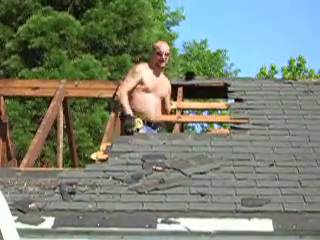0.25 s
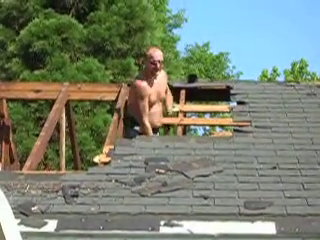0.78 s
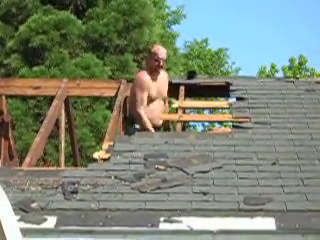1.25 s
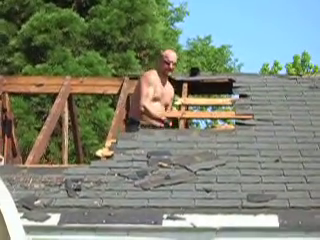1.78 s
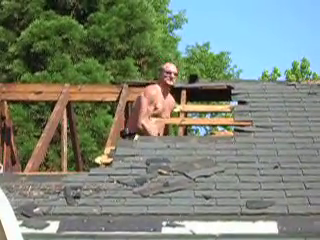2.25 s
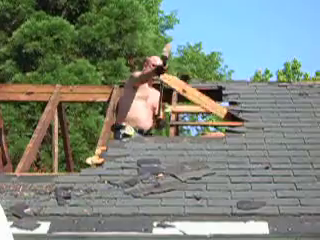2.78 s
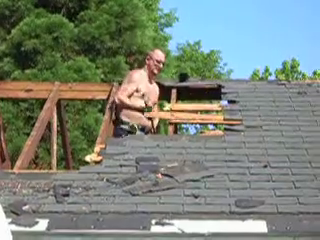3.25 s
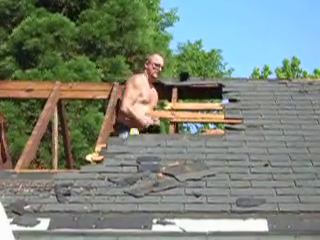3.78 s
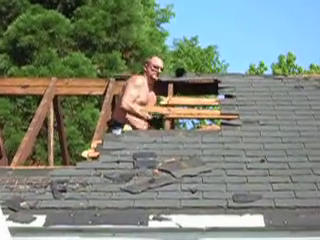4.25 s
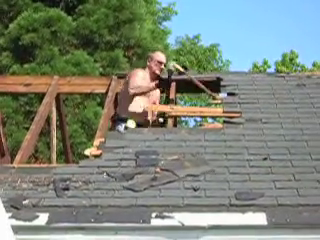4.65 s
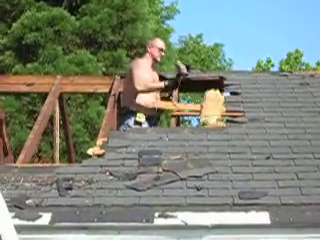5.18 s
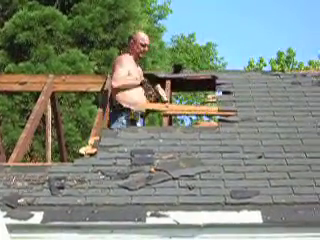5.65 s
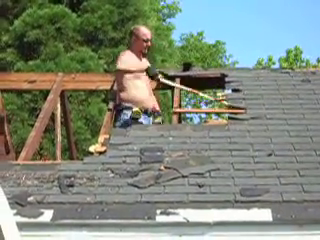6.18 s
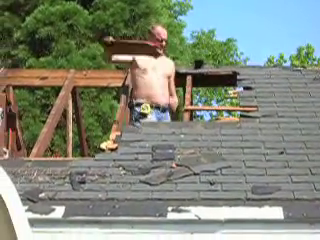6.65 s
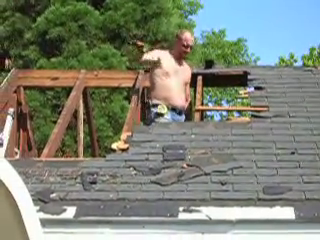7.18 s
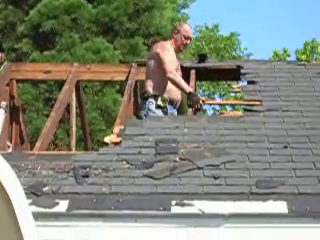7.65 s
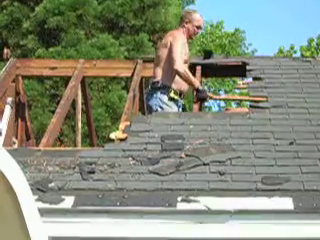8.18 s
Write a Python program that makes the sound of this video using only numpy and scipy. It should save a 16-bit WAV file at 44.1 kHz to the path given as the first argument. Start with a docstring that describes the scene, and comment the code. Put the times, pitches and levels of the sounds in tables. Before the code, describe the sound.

Outdoors, steady distant traffic rush and soft leaf hiss run throughout, with a faint low engine hum. Thin peeps come at 0.4-0.8 s, small chirps at 0.8 and 1.7, low hollow swells and a light shingle rustle, then a soft knock at 1.9. At 2.6 a board snaps off its nails with a hard woody crack; a hoarse, falling hawk scream follows at 2.9-3.3. A dull thud lands at 3.25. Sharp prying cracks with splintering and ringing bar chatter come at 4.3, 4.75 and 5.4, a chirp at 5.0. From 5.4 to 6.7 planks knock and tumble, boards scraping over grit, with another chirp at 6.2. Faint tyre whine passes near 7; a weaker scream falls at 7.4-7.9. Thuds at 7.8, a clear chirp at 7.9, then the loudest rapid clatter and scrape at 8.2. Narrow microphone, clipped peaks, light tree echo.

```python
"""First you hear the rush of distant traffic and hissing leaves, with a low hollow swell and a bird's peeps.
Then old boards are pried off a roof: nails crack loose, planks knock and drop, and boards slide over grit.
Blows are short bursts of ringing wood; traffic, leaves and scraping are shaped noise; bird calls are gliding
tones, with a hawk's falling screams among them. Trees echo the work and the birds.
A narrow-band microphone path lets a little folded-back treble through and clips the hardest cracks."""
import sys
import numpy as np
from scipy import signal
from scipy.fft import rfft, irfft, next_fast_len
from scipy.io import wavfile
from scipy.ndimage import uniform_filter1d, map_coordinates

SR = 44100
rng = np.random.default_rng(int(sys.argv[2]) if len(sys.argv) > 2 else 0)


def generate_wav(sig):
    """Save sig (samples, or channels by samples) to the path in sys.argv[1] as 16-bit PCM at SR."""
    pcm = np.round(np.clip(np.atleast_2d(sig).T, -1, 1) * 32767).astype(np.int16)
    wavfile.write(sys.argv[1], SR, pcm)


N = 371322
TIME = np.arange(N) / SR  # seconds

# Level of the road rush, before ROAD_DB: t/s, level/dB
ROAD_LEVEL = [(0.0, -32), (0.35, -32.5), (1.33, -32.5), (1.76, -29.5), (2.6, -30.5), (2.72, -36),
              (2.95, -32.5), (3.33, -27.5), (4.01, -33.5), (5.3, -30.5), (5.82, -24), (6.14, -28),
              (6.49, -27), (6.71, -31), (7.83, -30), (7.95, -26.5), (8.42, -34.5)]
# Colour of the road rush: f/Hz, relative level per Hz/dB
ROAD_COLOUR = [(18, -49), (30, -13), (32, -35.5), (54, -29), (74, -17.5), (118, -12.5), (147, -7),
               (206, -9), (298, 0), (365, -4), (491, -3), (590, -5), (794, -4), (1090, -12), (2500, -28),
               (3250, -45.5), (5500, -120)]
# Level of the leaf hiss, before LEAVES_DB: t/s, level/dB
LEAF_LEVEL = [(0.0, -43.5), (2.62, -44.5), (2.84, -36), (3.98, -46.5), (4.55, -39), (6.36, -43),
              (6.47, -36), (6.82, -46.5), (7.34, -47), (7.69, -46.5), (8.18, -42.5), (8.42, -37)]
# Colour of the leaf hiss: f/Hz, relative level per Hz/dB
LEAF_COLOUR = [(500, -22.5), (1200, 8.5), (2000, -1), (3000, 0.5), (3600, -3.5), (4000, -12), (4400, -16.5)]
ROAD_DB, LEAVES_DB = -0.06, 1
# A far engine, slowly receding
HUM_HZ, HUM_SAG_HZ_PER_S, HUM_DB, HUM_FADE_DB_PER_S = 153.4, 0.9, -43, 1.0
# Tyres of passing trucks: t/s, length/s, f/Hz, level/dB
TYRE_WHINES = [(6.88, 0.51, 411.6, -34), (7.93, 0.54, 378.5, -26)]
WHINE_SAG_HZ_PER_S = 9.5

# How long the tree echo rings at each frequency: f/Hz, time to fade by 60 dB/s
TREE_FADE = [(150, 0.24), (600, 0.12), (2000, 0.67), (4000, 0.55)]

# Start of each small bird chirp: t/s, level/dB
CHIRP_TIMES = [(0.819, -31.5), (1.659, -28.5), (1.94, -46), (2.0, -49), (5.032, -31), (6.223, -32),
               (7.894, -26.5)]
# Shape of one chirp: t from its start/s, f/Hz, level against the chirp's own/dB
CHIRP_SHAPE = [(0, 3406, -10.5), (.015, 3800, -9), (.03, 3547, -7.5), (.042, 2760, -16), (.055, 3190, 2),
               (.064, 3580, -7.5), (.075, 3060, -0.5), (.095, 2854, -10.5)]
# Single thin bird notes: t/s, f/Hz, level/dB
PEEP_NOTES = [(.395, 3300, -44.5), (0.689, 3970, -48.5), (0.72, 3950, -50), (0.785, 3980, -43.5),
              (1.985, 3300, -40), (2.035, 3140, -38)]

# A hawk's screams: t/s, length/s, rise/s, top f/Hz, end f/Hz, whistle level/dB,
# share of the call where the whistle peaks, harshness level/dB, fading of the harshness over the call/dB
HAWK_SCREAMS = [(2.91, .42, 0.0359, 931, 764.6, -31, 0.48, -31, 26.5),
                (7.424, .48, .064, 928, 793, -33.5, .15, -38, 7)]
SCOOP, SAG_SHAPE = 0.18, 0.68  # starts this share below the top; the fall is quick at first, then slower
WHISTLE_EDGE_DB = 11.5  # fading per call length on either side of the whistle's peak
WAVER_DB = 2

# Colour of grit under sliding boards and shingles: f/Hz, relative level per Hz/dB
GRIT_COLOUR = [(150, -29), (300, -13), (500, -6), (780, -0.5), (1050, -4), (1500, -8), (2100, -11.5),
               (3000, -13), (3700, -23), (4300, -36)]
# Boards dragged over grit: t/s, length/s, level the fading starts from/dB
BOARD_SLIDES = [(5.368, .25, -28), (5.658, 0.21, -33), (5.869, 0.29, -24.5), (6.338, 0.47, -28),
                (7.757, 0.23, -29.5), (8.184, 0.24, -20.5)]
SLIDE_ATTACK_S, SLIDE_LOSS_DB = 0.012, 18.5  # a quick start, then this loss over the slide's length
# Shingles shift: t/s, length/s, level the fading starts from/dB
SHINGLE_RUSTLES = [(1.247, 0.15, -41.5), (1.9, 0.19, -42.5), (2.672, .2, -38.5), (3.224, 0.079, -33.5)]
# Low hollow swells, from planks rubbing or from far traffic: t/s, length/s, level at the middle/dB
HOLLOW_SWELLS = [(0.29, 0.41, -34), (1.037, 0.1, -31), (1.53, 0.29, -30), (3.29, 0.33, -38),
                 (4.499, 0.21, -26.5), (7.25, .4, -36.5)]

# The steel pry bar springs free and chatters: t/s, level/dB
BAR_CHATTERS = [(4.315, -29), (4.779, -31), (5.38, -36)]
# Resonances of the bar chatter: f/Hz, width/Hz, relative level/dB
BAR_MODES = [(1544, 84, 7.5), (1686, 50, 7), (1640, 22, 4), (2070, 350, 4.5), (2410, 200, -2)]

# Resonances of the planks: f/Hz, width/Hz, relative level/dB
PLANK_MODES = [(274, 50, -4.5), (366, 140, -4), (500, 90, -1), (729, 160, -4.5), (1020, 380, -8),
               (1335, 140, -4.5), (1917, 130, -3.5), (1948, 65, -0.5), (2360, 180, -9), (2848, 100, -1.5),
               (3139, 74, -1), (3644, 220, -9)]
# Loose planks strike the roof, and hard cracks follow two of the nail snaps: t/s, knock level/dB, knock f/Hz,
# hardness 0-1, time to fade by 60 dB/s
PLANK_KNOCKS = [(1.907, -23, 690, 0.15, 0.045), (2.636, -18, 810, 0.84, 0.011),
                (4.765, -19.5, 1190, 1, .012), (5.640, -16.5, 530, 0.74, 0.087),
                (5.684, -25.5, 1226, 1, .08), (5.861, -19, 472, 1, 0.1), (5.897, -17, 738, 0.1, 0.13),
                (5.912, -16.5, 836, 0.13, 0.12), (5.932, -18.5, 831, 0, 0.17),
                (6.297, -16.5, 587, 0.45, 0.2), (6.381, -15.5, 1118, 1, 0.11), (6.393, -21, 737, 1, 0.052),
                (6.475, -31, 707, 0.65, .13), (6.546, -23, 605, 0.4, 0.25), (6.671, -25.5, 765, 0.35, 0.16),
                (8.175, -11.5, 770, 0.4, 0.042), (8.181, -13, 1510, .35, 0.051),
                (8.1992, -15.5, 1457, 0.7, 0.02), (8.211, -19, 1920, 0.6, 0.026),
                (8.2404, -15.5, 1320, 0.5, 0.012), (8.2655, -16.5, 830, 0.8, 0.021),
                (8.276, -22, 935, .95, 0.034)]
# Against the knock: a flat landing moves the deck, an edge does not
SOFT_THUD_DB, HARD_THUD_DB = -1.5, -27
SOFT_CRACK_DB, HARD_CRACK_DB = -18.5, -7
DECK_HZ = 291.6
# Weight lands on the deck, and at 4.286 s a board first gives before its nail snaps: t/s, thud level/dB, thud
# f/Hz
DECK_THUDS = [(3.249, -19.5, 296), (4.286, -22.5, 364), (4.609, -36, 331), (5.724, -16.5, 248),
              (7.763, -21, 248), (7.777, -20, 351), (7.821, -21, 292), (8.058, -35, 383)]
THUD_KNOCK_DB, THUD_CRACK_DB, THUD_KNOCK_HZ, THUD_T60 = -10.5, -20.5, 466, 0.13  # levels against the thud

# A board is levered off its nails: t/s, thud level/dB, knock level/dB, crack level/dB, thud f/Hz, knock f/Hz,
# time to fade by 60 dB/s, time the board gives before the snap/s, give level/dB, first splinter's level/dB
NAIL_PRIES = [(2.6058, -13, -13.5, -15, 262, 798, 0.056, 0.0019, -21, -19),
              (4.3048, -30, -19.5, -11.5, 340, 1304, 0.061, .010, -18, -30),
              (4.7465, -26, -16.5, -16, 360, 792, 0.058, 0.0077, -18.5, -34),
              (5.368, -25.5, -12.5, -20, 307, 1020, 0.015, .017, -22, -32.5)]
DECK_LAG_S, DECK_T60 = 0.003, 0.055  # the deck swings back just after the snap
# The board yielding: (thud, knock, crack) against the give level in dB, knock pitch, 60 dB fade time in s
GIVE_BALANCE_DB, GIVE_HZ, GIVE_T60 = (-2, -2.5, -8), 605, 0.09
# Fibres tear one after another
SPLINTER_DELAY_S, SPLINTER_GAP_S, SPLINTER_LOSS_DB, SPLINTER_T60 = 0.016, 0.015, 4, 0.055
SPLINTER_THUD_DB, SPLINTER_KNOCK_DB = -3.5, -2.5  # against their crack

MIC_HZ, TOP_HZ = 4100, 15800  # upper limits of the microphone path and of the clipped sound


def amp(db):
    """Turn decibels into gain."""
    return 10 ** (np.asarray(db) / 20)


def unit(x):
    """Scale to an average strength (rms) of 1."""
    return x / np.sqrt(np.mean(x ** 2) + 1e-20)


def along(points, hz):
    """Read a curve of (Hz, value) points on a log frequency axis."""
    f, v = np.transpose(points)
    return np.interp(np.log(hz + 1), np.log(f + 1), v)


def curves(rows, t=TIME):
    """Give one value per sample for each column after the time."""
    s, *columns = np.transpose(rows)
    return [np.interp(t, s, column) for column in columns]


def during(rows, t=TIME):
    """A gate that is 1 from the first row's time to the last, with 13 ms ramps inside both ends."""
    return np.clip(np.minimum(t - rows[0][0], rows[-1][0] - t) / 0.013, 0, 1)


def arch(s, length):
    """A half-sine swell that starts at time s."""
    return np.sin(np.pi * np.clip((TIME - s) / length, 0, 1))


def wobble(rate):
    """A smooth random curve through this many random points a second."""
    return map_coordinates(rng.standard_normal(int(N * rate / SR) + 4), [TIME * rate])


def cycles(hz):
    """Add up a moving frequency into a phase."""
    return 2 * np.pi * np.cumsum(hz) / SR


def filtered(x, response):
    """Shape a sound with a response that depends on frequency."""
    m = next_fast_len(len(x) + SR // 4)
    return irfft(rfft(x, m) * response(np.fft.rfftfreq(m, 1 / SR)), m)[:len(x)]


def band(x, lo_hz, hi_hz):
    """Keep the frequencies between two limits."""
    return signal.sosfilt(signal.butter(3, [lo_hz, hi_hz], "band", fs=SR, output="sos"), x)


def body(modes, f):
    """Response of an object that rings at several (Hz, width, dB) resonances."""
    total = 0
    for k, (center, width, db) in enumerate(modes):
        ring = 1j * f * width / (center * center - f * f + 1j * f * width)
        total = total + (-1) ** k * amp(db) * ring
    return total


def add(track, s, sound):
    """Mix a sound into the track at time s."""
    part = track[max(round(s * SR), 0):][:len(sound)]
    part += sound[:len(part)]


def rush(spectrum, patchy_db):
    """Coloured noise of rms 1 whose gain varies in random patches of time and frequency."""
    z = signal.stft(rng.standard_normal(N), nperseg=1024)[2]
    field = uniform_filter1d(rng.standard_normal(z.shape), size=6, axis=0)
    field = uniform_filter1d(field, size=9, axis=1)
    noise = signal.istft(z * amp(patchy_db * unit(field)), nperseg=1024)[1][:N]
    return unit(filtered(noise, lambda hz: amp(along(spectrum, hz))))


def background():
    """Shaped noise makes road rush and leaf hiss; wavering tones make an engine hum and tyre whines."""
    road = amp(curves(ROAD_LEVEL)[0] + ROAD_DB + 0.13 * wobble(4.1)) * rush(ROAD_COLOUR, patchy_db=2.0)
    leaves = amp(curves(LEAF_LEVEL)[0] + LEAVES_DB) * rush(LEAF_COLOUR, patchy_db=2.5)
    hum_hz = HUM_HZ - HUM_SAG_HZ_PER_S * TIME + 3 * wobble(15)
    hum_db = HUM_DB - HUM_FADE_DB_PER_S * TIME + 3 * wobble(8)
    out = road + leaves + amp(hum_db) * np.sin(cycles(hum_hz))
    for s, length, whine_hz, db in TYRE_WHINES:
        phase = cycles(whine_hz - WHINE_SAG_HZ_PER_S * (TIME - s) + 5 * wobble(30))
        tread = np.sin(phase) + amp(-9 + 3 * wobble(20)) * np.sin(1.65 * phase)
        out += amp(db + 2.5 * wobble(12)) * arch(s, length) * tread
    return out


def trees(x, build_s):
    """The tree line scatters sound back; the echo builds up, then fades at a speed set by frequency."""
    hz, t, z = signal.stft(rng.standard_normal(SR), SR, nperseg=256)
    fade = amp(-60 * t / along(TREE_FADE, hz)[:, None])
    build = 1 - np.exp(-t / build_s)
    tail = signal.istft(z * fade * build, SR, nperseg=256)[1]
    return signal.fftconvolve(x, tail / np.linalg.norm(tail))[:N]


def small_bird():
    """Thin peeps, and chirps: a faint lead-in note, then a quick, slightly hoarse rise and fall."""
    out, t = np.zeros(N), np.arange(SR // 8) / SR
    hz, shape_db = curves(CHIRP_SHAPE, t)
    for s, db in CHIRP_TIMES:
        pitch = hz * (1 + 0.05 * wobble(700)[:len(t)])  # fast random pitch changes sound hoarse
        add(out, s, amp(db + shape_db) * during(CHIRP_SHAPE, t) * np.sin(cycles(pitch)))
    swell = np.hanning(SR // 30)
    for s, peep_hz, db in PEEP_NOTES:
        pitch = peep_hz * (1 + 0.014 * wobble(360)[:len(swell)])
        add(out, s, amp(db) * swell * np.sin(cycles(pitch)))
    return out


def hawk():
    """A scream scoops up and sags: fading harsh harmonics join a whistle on the fourth harmonic."""
    out = np.zeros(N)
    for s, length, rise_s, top_hz, end_hz, whistle_db, peak, harsh_db, fading_db in HAWK_SCREAMS:
        age = np.clip(TIME - s, 0, length)
        rising = np.clip(1 - age / rise_s, 0, 1)  # 1 down to 0
        falling = np.clip((age - rise_s) / (length - rise_s), 0, 1)  # 0 up to 1
        hz = top_hz * (1 - SCOOP * rising ** 2) + (end_hz - top_hz) * falling ** SAG_SHAPE
        phase = cycles(hz * (1 + 0.008 * wobble(250) + 0.004 * wobble(25)))
        harsh = np.sin(3 * phase) + amp(-8) * np.sin(2 * phase) + amp(-8) * np.sin(5 * phase)
        harsh *= amp(harsh_db - fading_db * falling) * (1 - falling ** 2)
        whistle = amp(whistle_db - WHISTLE_EDGE_DB * np.abs(age / length - peak)) * np.sin(4 * phase)
        out += (harsh + whistle) * during([(s,), (s + length,)]) * amp(WAVER_DB * wobble(50))
    return out


def scraping():
    """Mineral grit catches and slips under boards and shingles; a low band of the same clicks swells hollowly."""
    slips = rng.standard_normal(N) * (rng.random(N) < 5000 / SR)  # about 5000 random clicks a second
    slips *= amp(2 * wobble(60))
    grit = filtered(slips, lambda hz: amp(along(GRIT_COLOUR, hz)))
    grit /= np.std(band(grit, 1200, 2700))
    drag, shift, swell = np.zeros(N), np.zeros(N), np.zeros(N)
    for s, length, db in BOARD_SLIDES:
        attack = np.clip((TIME - s) / SLIDE_ATTACK_S, 0, 1)
        fade = amp(db - SLIDE_LOSS_DB * np.abs(TIME - s) / length)
        drag += fade * attack * during([(s,), (s + length,)])
    for s, length, db in SHINGLE_RUSTLES:
        fade = amp(db - 5.8 * np.clip((TIME - s) / length, 0, 1))
        shift += fade * during([(s,), (s + length,)])
    for s, length, db in HOLLOW_SWELLS:
        swell += amp(db) * arch(s, length)
    return drag * grit + shift * unit(band(slips, 2000, 3800)) + swell * unit(band(slips, 247, 540))


def pry_bar():
    """The bar chatters against the wood: uneven noise rings through resonances and dies away."""
    contact = rng.standard_normal(N) * amp(2.5 * wobble(80))
    chatter = unit(filtered(contact, lambda f: body(BAR_MODES, f)))
    level = np.zeros(N)
    for s, db in BAR_CHATTERS:
        level += amp(db - 45 * np.abs(TIME - s)) * (TIME > s)  # loses 45 dB a second
    return chatter * level


def early_unit(x):
    """Scale so that the first 20 ms have rms 1."""
    return x / np.sqrt(np.mean(x[:SR // 50] ** 2))


def blow(levels_db, thud_hz, knock_hz, t60):
    """The three parts of a blow: it flexes the deck (thud), rings one board (knock) and tears fibres (crack)."""
    t = np.arange(SR // 3) / SR
    fade = amp(-60 * t / max(t60, 0.01))
    push = fade * (1 - np.exp(-t / 0.00067))  # the wood takes a moment to give
    rub = rng.standard_normal(len(t))
    contact = rub * fade * (1 + 0.6 * np.exp(-t / 0.0035))  # a snap, then splintering
    ringing = filtered(contact, lambda f: body(PLANK_MODES, f))
    wood = early_unit(ringing) + 0.48 * early_unit(contact)
    thud_tone = early_unit(np.sin(2 * np.pi * thud_hz * t) * push)
    knock_tone = early_unit(np.sin(2 * np.pi * knock_hz * t) * push)
    thud = early_unit(thud_tone + 0.41 * early_unit(band(rub * push, 62, 580)))
    knock = early_unit(0.73 * knock_tone + early_unit(band(wood, 450, 1500)))
    crack = early_unit(band(wood, 1570, 4800))
    return amp(levels_db)[:, None] * np.array([thud, knock, crack])


def planks():
    """Harder knocks are brighter and move the deck less; thuds are nearly all deck."""
    out = np.zeros(N)
    for s, db, knock_hz, hardness, t60 in PLANK_KNOCKS:
        hard = np.clip(hardness, 0, 1)
        thud_db = db + SOFT_THUD_DB + (HARD_THUD_DB - SOFT_THUD_DB) * hard
        crack_db = db + SOFT_CRACK_DB + (HARD_CRACK_DB - SOFT_CRACK_DB) * hard
        deck_hz = DECK_HZ * (1 + rng.normal(0, 0.05))
        add(out, s, blow((thud_db, db, crack_db), deck_hz, knock_hz, t60).sum(0))
    for s, db, thud_hz in DECK_THUDS:
        levels_db = (db, db + THUD_KNOCK_DB, db + THUD_CRACK_DB)
        add(out, s, blow(levels_db, thud_hz, THUD_KNOCK_HZ, THUD_T60).sum(0))
    return out


def prying(count=3):
    """The board gives, the nail snaps loose, the deck swings back and a few splinters tear after it."""
    out = np.zeros(N)
    for s, thud_db, knock_db, crack_db, thud_hz, knock_hz, t60, give_s, give_db, splinter_db in NAIL_PRIES:
        give = blow(give_db + np.array(GIVE_BALANCE_DB), thud_hz, GIVE_HZ, GIVE_T60)
        add(out, s - give_s, give.sum(0))
        snap_db = (thud_db, knock_db, crack_db)
        _, knock, crack = blow(snap_db, thud_hz, knock_hz, t60)
        add(out, s, knock + crack)
        deck_thud = blow(snap_db, thud_hz, knock_hz, DECK_T60)[0]
        add(out, s + DECK_LAG_S, deck_thud)
        for k in range(count):
            db = splinter_db - SPLINTER_LOSS_DB * k
            late, detune = rng.normal(0, 0.15, 2)  # late is a share of the gap
            levels_db = (db + SPLINTER_THUD_DB, db + SPLINTER_KNOCK_DB, db)
            splinter = blow(levels_db, thud_hz, knock_hz * (1 + detune), SPLINTER_T60)
            add(out, s + SPLINTER_DELAY_S + SPLINTER_GAP_S * (k + late), splinter.sum(0))
    return out


def scene():
    """Work on the roof and birds, both echoed by the trees, over the background."""
    work = prying() + planks() + pry_bar() + scraping()
    chirps, screams = small_bird(), hawk()
    echoes = amp(-17.0) * trees(work, build_s=0.065)
    echoes += trees(amp(-3.5) * chirps + amp(-2.5) * screams, build_s=0.0069)  # the birds sit among the trees
    return (work + chirps + screams + echoes + background())[None]


def record(dry):
    """A coarsely sampled microphone path folds back its top, then a stage that sits off zero clips."""
    pressed = dry[0] / (1 + np.abs(dry[0] / 0.95) ** 4) ** 0.25  # rounds off loud peaks
    soft = filtered(pressed, lambda hz: 1 / np.sqrt(1 + (hz / 4500) ** 30))
    sampled = soft * 5 * (np.arange(N) % 5 == 0)  # keeps every fifth sample
    narrow = filtered(sampled, lambda hz: 1 / np.sqrt(1 + (hz / MIC_HZ) ** 70))
    clipped = np.clip(narrow - 0.062, -0.73, 0.73)
    return filtered(clipped, lambda hz: 1 / np.sqrt(1 + (hz / TOP_HZ) ** 120))[None]


dry = scene()
out = record(dry)
generate_wav(out)
```